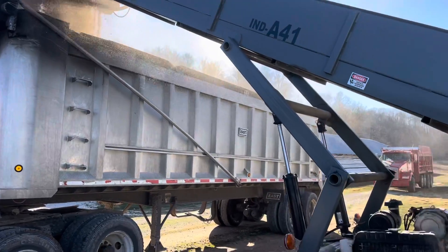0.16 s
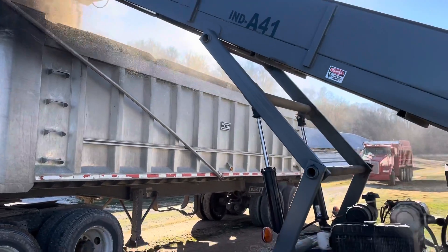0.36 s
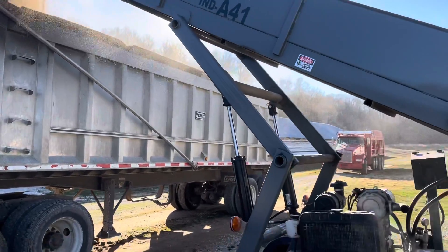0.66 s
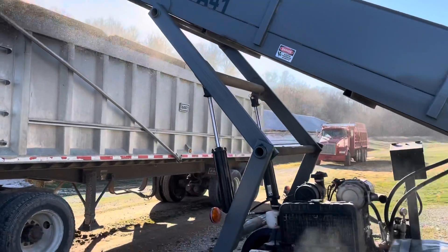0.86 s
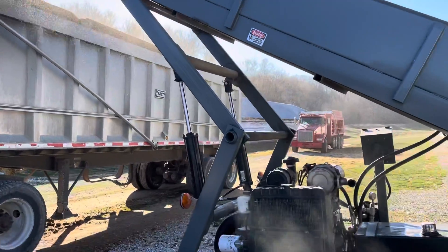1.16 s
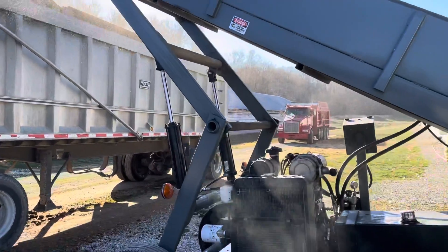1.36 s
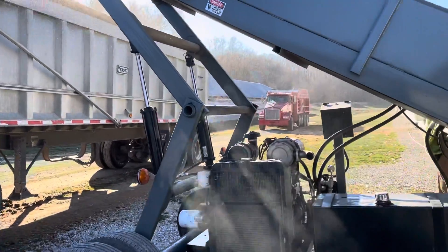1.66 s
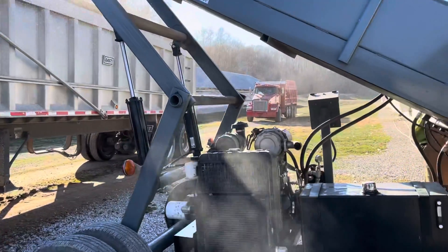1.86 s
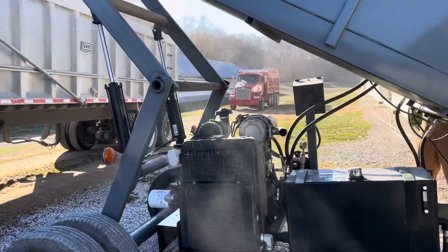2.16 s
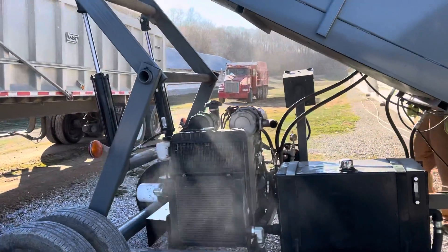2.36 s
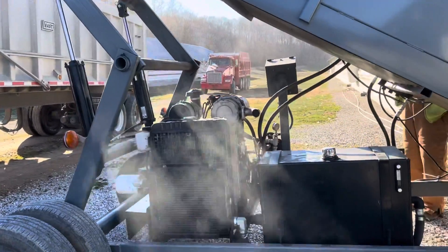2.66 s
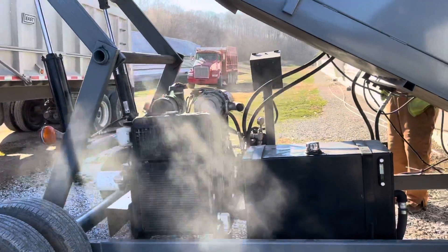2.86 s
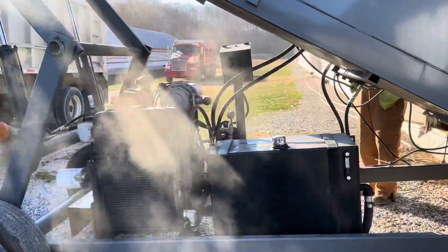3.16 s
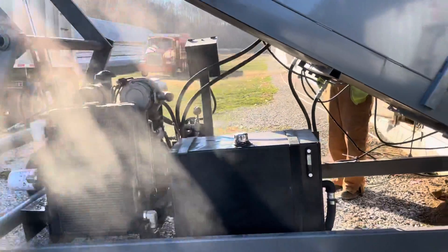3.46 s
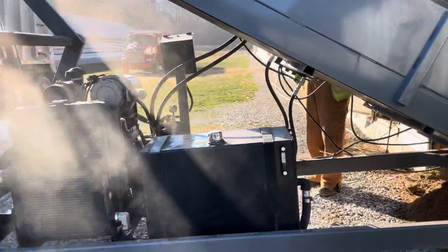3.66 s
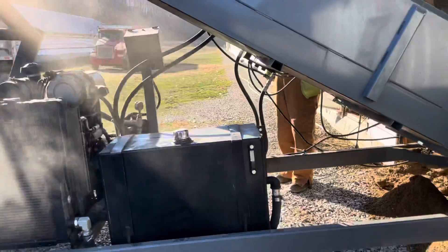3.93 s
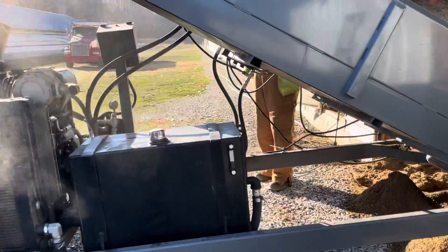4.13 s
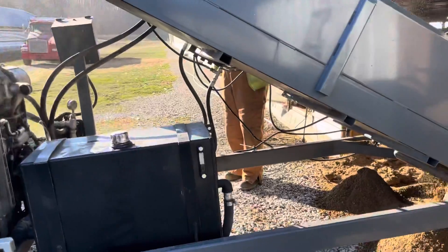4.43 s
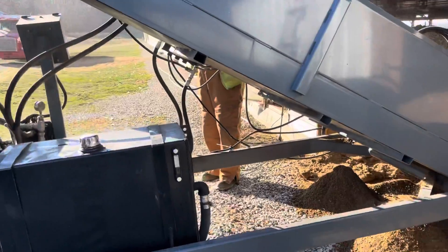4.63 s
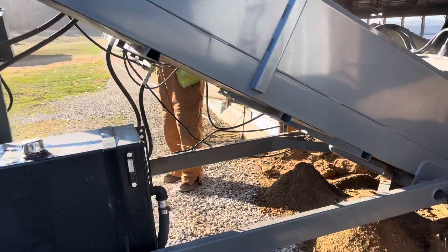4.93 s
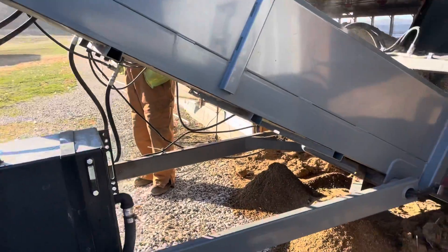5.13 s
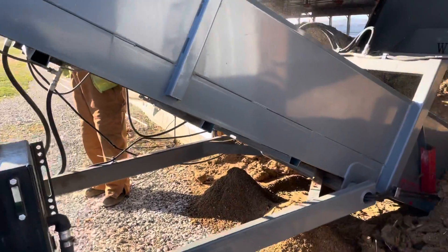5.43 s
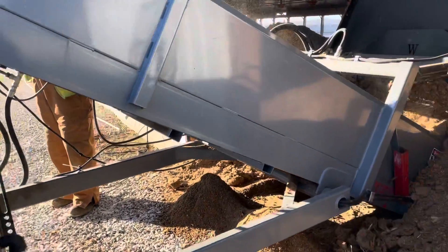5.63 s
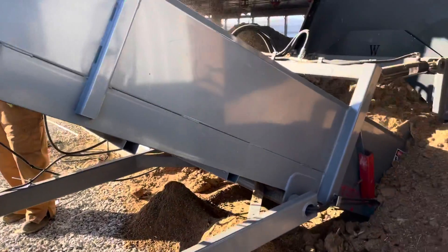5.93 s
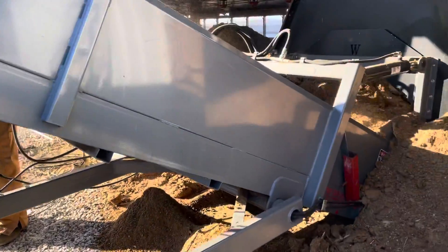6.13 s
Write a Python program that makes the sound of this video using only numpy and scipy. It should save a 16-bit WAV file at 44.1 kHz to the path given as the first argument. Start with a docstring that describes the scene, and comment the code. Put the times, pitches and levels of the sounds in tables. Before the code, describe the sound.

Constant low diesel hum, fan roar and quick valve clatter, with a conveyor chain tapping eleven times a second and slapping harder later on.

```python
"""Diesel-driven chain conveyor in the open

A four-cylinder diesel at steady speed drives a chain conveyor beside a metal trailer.
Exhaust orders hum as harmonics with an echo, shaft multiples whine, and valve gear and injectors knock
once a cycle as struck resonators. Fan and casing roar as filtered noise; chain links pass about eleven
times a second, tapping or slapping as noise bursts in the link's resonances.
A hand-held stereo listener turns slowly from the trailer past the engine towards the hopper."""
import sys
import numpy as np
from scipy import signal
from scipy.fft import rfft, irfft, next_fast_len
from scipy.io import wavfile

SR = 44100
rng = np.random.default_rng(int(sys.argv[2]) if len(sys.argv) > 2 else 0)


def volts_from_db(level):
    """Convert decibel levels to linear amplitude ratios."""
    exponent = np.asarray(level, float) / 20
    return 10 ** exponent


def dump_mix(stems):
    """Bounce the given channels to the path in sys.argv[1] as a 16-bit WAV at rate SR."""
    frames = np.atleast_2d(stems).T  # one column per channel
    limited = np.clip(frames, -1, 1)  # hard clip at full scale
    pcm = np.round(limited * 32767).astype(np.int16)
    wavfile.write(sys.argv[1], SR, pcm)


N = 277389
SIZE = next_fast_len(N + 8192)   # FFT length with room for filter tails

CYCLE_HZ = 12.587   # mean rate of the four-stroke cycle
LINKS_PER_S, LINK_START = 10.98, 0.86   # link rate; wait for the first link, in link spacings
# links that slap hard: (time [s], peak drive [dB], treble drive relative to it [dB])
HARD_SLAPS = [(0.2533, -26, -9), (0.7148, -34, -5), (0.8954, -23, -12), (1.063, -33, -9),
              (1.332, -26, -8.5), (1.6067, -27, -11), (2.1735, -18, -20), (2.2553, -23, -12),
              (2.361, -20.5, -21), (2.466, -17, -17), (2.897, -18, -10.5), (2.985, -17.5, -12),
              (3.238, -24, -14), (3.713, -24, -12.5), (3.805, -15, -14.5), (3.9015, -16, -13.5),
              (4.3475, -20, -19), (4.443, -16.5, -14.5), (4.5267, -15, -22), (4.624, -18, -19),
              (4.8085, -14.5, -17.5), (4.9771, -20, -22), (5.1781, -17.5, -17), (5.255, -23, -16),
              (5.4326, -18, -23), (5.5353, -18, -16.5), (5.9983, -8, -18), (6.168, -16, -19)]


def in_time(rows):
    """Piecewise-linear interpolation of a table's columns over time."""
    s, *columns = np.transpose(rows)
    return [np.interp(np.arange(N) / SR, s, c) for c in columns]


def in_pitch(rows):
    """Interpolation of a table's columns at every FFT bin, linear in log frequency."""
    hz, *columns = np.transpose(rows)
    bins = np.log(np.arange(1, SIZE // 2 + 2) * SR / SIZE)
    return [np.interp(bins, np.log(hz), c) for c in columns]


def faced(facing, values):
    """Linear interpolation between the values of the three directions."""
    return np.interp(facing, range(3), values)


def shaped(x, gain):
    """Linear filtering as multiplication of the spectrum by a gain for each bin."""
    return irfft(rfft(x, SIZE) * gain, SIZE)[..., :N]


def drift(corner_hz):
    """Random fluctuation of unit spread: white noise through a two-pole low-pass, at SR / 40."""
    r = np.exp(-2 * np.pi * corner_hz * 40 / SR)
    noise = rng.standard_normal(N // 40 + 2002)
    slow = signal.lfilter([1], [1, -2 * r, r * r], noise)[2000:]   # start-up dropped
    return np.interp(np.arange(N) / 40, np.arange(len(slow)), slow / slow.std())


def resonance(x, hz, width_hz):
    """Damped resonator: a two-pole band-pass with peak gain near 1."""
    r = np.exp(-np.pi * width_hz / SR)
    rise = np.array([1, 0, -1]) * (1 - r * r) / 2
    return signal.lfilter(rise, [1, -2 * r * np.cos(2 * np.pi * hz / SR), r * r], x)


def crank():
    """Phase as integrated speed: cycles turned, with a small random wander about the steady rate."""
    return CYCLE_HZ * np.arange(N) / SR + .004 * drift(1.0)


def hum(cycles):
    """Interference: each low order of the machine meets its own echo, which lifts or cancels it."""
    # direct tones and their echoes off the steel walls:
    # (direct level [dB rms], echo share [0-1], echo lag at the start [rad])
    tones = [(-18.7, .1, -.9), (-25.3, .81, -.8), (-27.5, .17, 2.33), (-33.5, .76, 2.84)]
    # multiples of the cycle: firing tone, its second and third multiple, fan blade tone: (order [1])
    tone_orders = [4, 8, 12, 18]
    # growth of the echo's detour as the listener steps along the machine: (time [s], path [m])
    detour = [(0, 0), (1.5, .44), (3, .59), (4.5, 1.13), (5.3, 1.66), (6.29, 2.39)]
    firing_rad, skew_rad = 1.875, 1.93   # firing tone at the start; extra lead of its second multiple
    sound_m_per_s = 343
    detour_m, = in_time(detour)
    out = 0
    for order, (level_db, share, lag) in zip(tone_orders, tones):
        angle = 2 * np.pi * order * cycles + firing_rad * order / 4 + skew_rad * (order % 8 == 0)
        late = lag + 2 * np.pi * order * CYCLE_HZ * detour_m / sound_m_per_s
        level = np.sqrt(2) * volts_from_db(level_db + 0.46 * drift(12.0))
        out = out + level * (np.cos(angle) + min(share, 1) * np.cos(angle - late))
    return out


def whine(cycles, facing):
    """Harmonics of rotation: higher multiples of the cycle, each wavering in level and phase."""
    # pump and gear tones, before the loudness of the turn:
    # (level facing the trailer [dB rms], the engine [dB rms], the hopper [dB rms])
    tone_levels = [(-40.5, -35.5, -30), (-39, -36, -33), (-44.5, -42.5, -33.5), (-38, -37, -42),
                   (-46, -36.5, -38.5), (-34, -32.5, -40.5), (-42.5, -42, -47), (-44, -39, -52),
                   (-45, -39, -45), (-50, -35, -39), (-39, -41, -42), (-49.5, -49, -48), (-42, -46, -47),
                   (-44, -45, -37), (-46.5, -42, -58)]
    # multiples of the cycle, one for each tone: (order [1])
    tone_orders = [10, 20, 28, 36, 38, 56, 71, 76, 88, 90, 115, 124, 128, 132, 252]
    out = 0
    for order, levels_db in zip(tone_orders, tone_levels):
        level_db = faced(facing, levels_db) + 2.2 * drift(4.0)
        phase = 0.95 * drift(1.06) + rng.uniform(0, 2 * np.pi)
        out = out + np.sqrt(2) * volts_from_db(level_db) * np.cos(2 * np.pi * order * cycles + phase)
    return out


def knocks(cycles, facing):
    """Impulse response: contacts repeated every cycle, a little uneven, each ring a mode of the block."""
    # contacts, levels before the loudness of the turn: (place in the cycle [0-1], frequency [Hz],
    # 60 dB decay time [s], level facing the trailer [dB], the engine [dB], the hopper [dB])
    contacts = [(.87, 639, 0.042, -21.5, -20, -25), (.89, 1128, 0.067, -19.5, -13, -23.5),
                (.41, 1134, 0.037, -23, -15, -22), (.61, 1370, .06, -22, -22, -29),
                (.61, 1450, .1, -22, -23, -30), (.87, 700, .06, -22, -22, -26),
                (.89, 1430, 0.048, -22, -23.5, -27), (.9, 1570, 0.035, -29, -26, -17),
                (.4, 1545, 0.024, -30, -29, -15), (.4, 2606, 0.022, -24, -22, -36),
                (0.5, 2290, 0.016, -29, -27, -20), (.63, 2090, 0.018, -28, -21.5, -21),
                (.88, 2400, 0.0072, -23, -40, -16), (0.131, 2080, 0.013, -28, -27, -20),
                (.2, 690, 0.021, -21, -25, -41), (0.599, 357, 0.032, -26, -27, -20)]
    out = 0
    for place, hz, t60, *levels_db in contacts:
        uneven = cycles - place + .0005 * drift(8.0)
        at = np.flatnonzero(np.diff(np.floor(uneven)) > 0)
        clicks = np.full(N, 1e-18)
        strength_db = 1.8 * rng.standard_normal(100)[:len(at)]
        clicks[at] = volts_from_db(faced(facing[at], levels_db) + strength_db)
        r, w = volts_from_db(-60 / (t60 * SR)), 2 * np.pi * hz / SR
        out = out + signal.lfilter([0, np.sin(w)], [1, -2 * r * np.cos(w), r * r], clicks)
    return out


def roar(cycles, facing):
    """Broadband radiation on two paths: random noise plus clatter modulated periodically by the cycle."""
    # fan and casing spectrum, relative: (frequency [Hz],
    # density facing the trailer [dB per Hz], the engine [dB per Hz], the hopper [dB per Hz])
    spectrum = [(30, -16, -16, -16), (45, -8, -16, -14), (70, 6, 4, 5.5), (86, 2, 3.5, 0.5),
                (133, -2, -3, -3.5), (222, -0.5, 0.5, 0), (300, -2, -1, -1.5), (352, -3, -2.5, -5),
                (720, -7, -4.5, -5.5), (1004, -9, -7, -7.5), (1290, -13.5, -10.5, -10.5),
                (1430, -6.5, -9.5, -5.5), (1680, -11, -11, -3.5), (1900, -12.5, -11, -10.5),
                (2140, -14, -12, -10.5), (2650, -13.5, -12, -15), (3280, -21, -18.5, -21.5),
                (4270, -18, -15.5, -16), (5320, -23, -18.5, -24), (5500, -25.5, -24, -25.5),
                (7500, -26.5, -22.5, -29.5), (8000, -22, -22, -26), (11200, -29, -24.5, -26),
                (13100, -31.5, -28, -34), (14200, -46, -48, -48), (15900, -64, -62, -60)]
    level_db = -21.5   # rms over both paths, before the loudness of the turn
    steps = round(SR / CYCLE_HZ)
    pattern = rng.standard_normal((2, steps))
    clatter = pattern[:, (cycles % 1 * steps).astype(int) % steps]   # same noise every cycle
    swell = 0.64 + 0.99 * np.exp(-((4 * cycles - .5) % 1) / 0.35)   # sharp rise at each firing
    band = signal.butter(2, [420, 2800], "band", fs=SR, output="sos")
    clatter = signal.sosfilt(band, swell * clatter)
    air = rng.standard_normal((2, N)) * volts_from_db(1.2 * drift(5.6))
    source = air + clatter
    blend = 0
    for k, density_db in enumerate(in_pitch(spectrum)):
        nearness = np.clip(1 - abs(facing - k), 0, 1)   # crossfade between directions
        blend = blend + nearness * shaped(source, volts_from_db(density_db))
    return volts_from_db(level_db) * blend / blend.std()


def taps():
    """Random point process about a regular pulse: rows like HARD_SLAPS for links without a hard slap."""
    far_db, near_db, nearing_s = -38, -24.5, 2.5   # drive at the start, near the chain; time between
    spread_db, treble_db = 2, -21   # spread of both drives; treble relative to the peak
    early_s, jitter_s = 0.0056, 0.0095   # lead on the rattle's crest, unevenness
    link = np.arange(int(LINKS_PER_S * N / SR))
    late, strong, sharp = rng.standard_normal((len(link), 3)).T
    s = (link + LINK_START) / LINKS_PER_S - early_s + jitter_s * late
    peak_db = np.interp(s, [0, nearing_s], [far_db, near_db]) + spread_db * strong
    distance_s = abs(s[:, None] - np.array(HARD_SLAPS)[:, 0]).min(axis=1)
    free = distance_s > .5 / LINKS_PER_S
    return np.c_[s, peak_db, treble_db + spread_db * sharp][free & (s < N / SR)]


def chain():
    """Forced resonance: gritty noise swells and dies as links rattle, tap or slap, and excites their modes."""
    # modes of a link: (frequency [Hz], width [Hz], gain [dB])
    modes = [(1480, 910, -0.5), (4185, 480, 0), (4920, 890, -3), (6330, 1300, -10), (8540, 790, 16.5),
             (10740, 1660, 7.5), (12060, 1400, 8.5)]
    rattle_db = -29   # crest of the noise drive, before its drift and the modes
    turns = LINKS_PER_S * np.arange(N) / SR - LINK_START
    passing = (.5 + .5 * np.cos(2 * np.pi * turns)) ** 1.3
    dull = volts_from_db(rattle_db + 2.5 * drift(7.0)) * passing
    bright = volts_from_db(-14.5) * dull
    t = np.arange(round(.12 * SR)) / SR
    onset = 1 - np.exp(-t / 0.0024)
    shape = onset * (np.exp(-(t / 0.02) ** 2) + 0.46 * np.exp(-t / 0.082))
    for s, peak_db, treble_db in [*HARD_SLAPS, *taps()]:
        i = round(s * SR)
        dull[i:i + len(t)] += volts_from_db(peak_db) * shape[:N - i]
        bright[i:i + len(t)] += volts_from_db(peak_db + treble_db) * shape[:N - i]
    grit = rng.standard_normal((2, N)) * volts_from_db(1.9 * drift(230))
    out = 0
    for k, (hz, width_hz, gain_db) in enumerate(modes):
        drive = bright if hz > 7000 else dull
        out = out + volts_from_db(gain_db) * (-1) ** k * resonance(grit * drive, hz, width_hz)   # signs alternate
    return out


def stereo_image(paths, lead, likeness, balance_db):
    """Interchannel coherence: shared and opposed sound in two channels, with phase lead and tilt by pitch."""
    alike, side = np.clip(likeness, 0, 1), np.array([[1], [-1]])
    direct, scattered = rfft(paths, SIZE)
    pair = (np.sqrt(1 + alike) * direct + np.sqrt(1 - alike) * scattered * side) / np.sqrt(2)
    return irfft(pair * np.exp(.5j * lead * side) * volts_from_db(.5 * balance_db * side), SIZE)[:, :N]


def scene():
    """Superposition of all sources on a direct and a scattered path, heard in stereo while turning."""
    # turn of the listener: (time [s], direction [0 trailer, 1 engine, 2 hopper], loudness [dB])
    turn_path = [(0, 0.0028, 0.5), (1, 0, 0.5), (2, 0, 1), (3, 0.035, 1.5), (4, 1, .5), (4.8, 1.2, 2),
                 (5.5, 1.77, 0.5), (6.29, 1.7, 1)]
    # stereo image by band, nearly one shared sound at 8-9.3 kHz and above 12.7 kHz:
    # (frequency [Hz], then facing the trailer: left lead [rad], likeness [0-1], left over right [dB],
    # then facing the hopper: left lead [rad], likeness [0-1], left over right [dB])
    image_bands = [(50, .06, .995, -.3, .1, .995, -.3), (100, .1, .99, 0, .2, .99, 0),
                   (200, 0, .93, 0, .25, .97, 0), (350, 0.2, .72, -1, .6, .88, -.5),
                   (480, .6, .52, 2.5, 1.3, .8, 2), (700, .6, .7, 1, 1.8, .85, 4),
                   (1000, 1.2, .3, 3, 2.3, .78, 3), (1300, 3, .12, 2, 3.3, .65, 1.5),
                   (1700, 5.2, .4, 1.5, 4.5, .75, 0), (2100, 6.4, .72, 0, 6.4, .8, -1),
                   (2900, 7.3, .72, 2.5, 8.1, .6, 1.5), (3600, 6.9, .45, 2.5, 6.9, .3, 1.5),
                   (4100, 7, .75, 2.5, 6.9, .72, 3), (5200, 7.1, .62, 4.5, 7.1, .55, 4),
                   (5800, 5.2, .35, 1, 5, .3, 1), (7100, 4.7, .6, 2, 4.5, .55, 2),
                   (7500, 3.8, .75, 1, 3.8, .75, 1), (8000, np.pi, .97, 0, np.pi, .97, 0),
                   (9300, np.pi, .96, 0, np.pi, .96, 0), (10000, 2.5, .75, 0, 2.5, .75, 0),
                   (11500, 1.2, .7, 0, 1.2, .7, 0), (12700, 0, 1, 0, 0, 1, 0)]
    facing, loudness_db = in_time(turn_path)
    facing, cycles = np.clip(facing, 0, 2), crank()
    low_orders = hum(cycles)
    engine = whine(cycles, facing) + knocks(cycles, facing)
    echo = np.roll(engine, round(.0069 * SR))   # off the trailer's side; the end wraps to the start
    machine = np.array([engine, echo]) + roar(cycles, facing)
    paths = volts_from_db(loudness_db) * machine + chain()
    paths[0] += low_orders
    columns, turned = in_pitch(image_bands), np.clip(facing / 1.7, 0, 1)
    at_trailer, at_hopper = stereo_image(paths, *columns[:3]), stereo_image(paths, *columns[3:])
    return (1 - turned) * at_trailer + turned * at_hopper


def roll_off(x):
    """The treble ends steeply here."""
    return signal.sosfilt(signal.butter(12, 15700, fs=SR, output="sos"), x)


def record(dry):
    """Saturation and low-pass: peaks are rounded a little, a steep filter near 14 kHz removes the very top."""
    top = signal.butter(8, 14300, fs=SR, output="sos")
    rounded = 1.498 * np.tanh(dry / 1.5)
    mix = signal.sosfilt(top, rounded)
    return roll_off(mix)


dry = scene()
out = record(dry)
dump_mix(out)
```